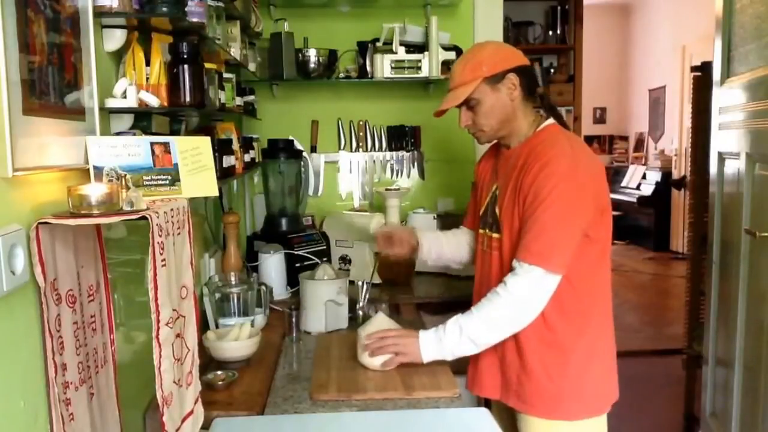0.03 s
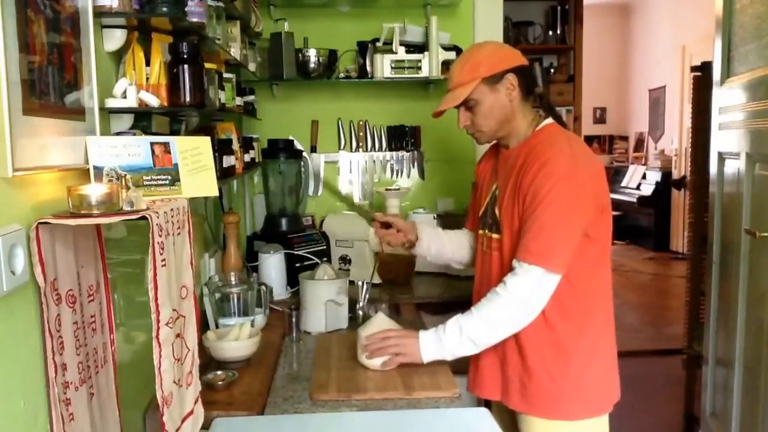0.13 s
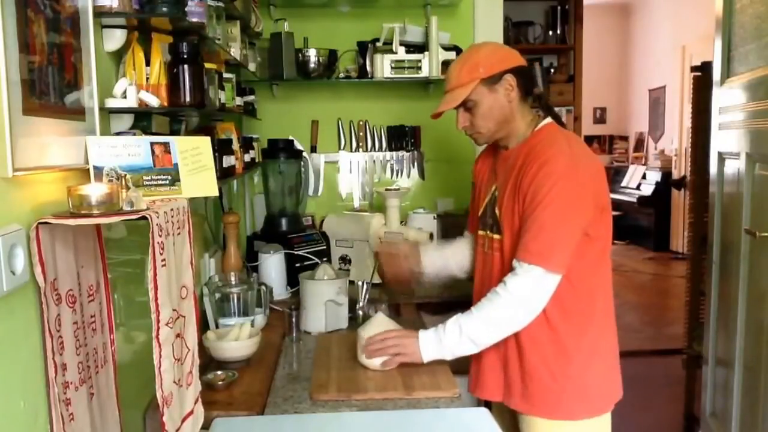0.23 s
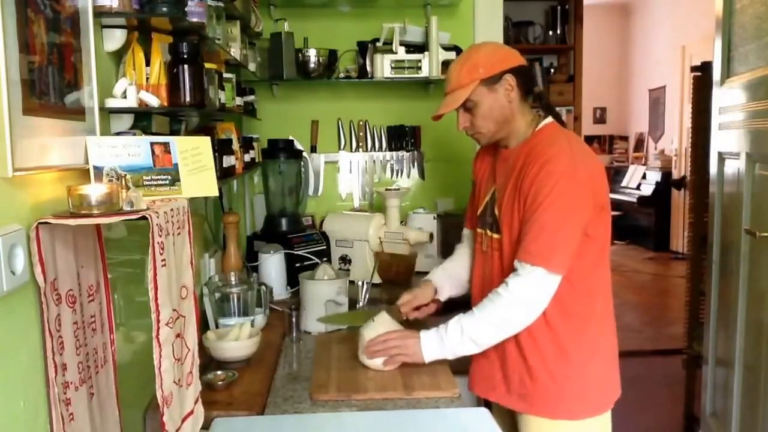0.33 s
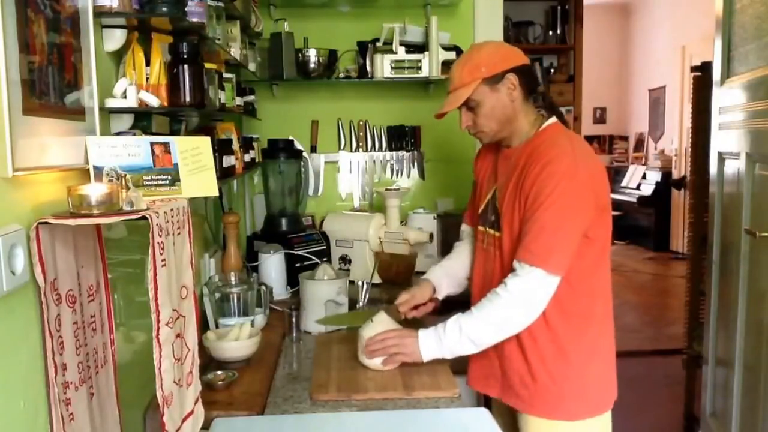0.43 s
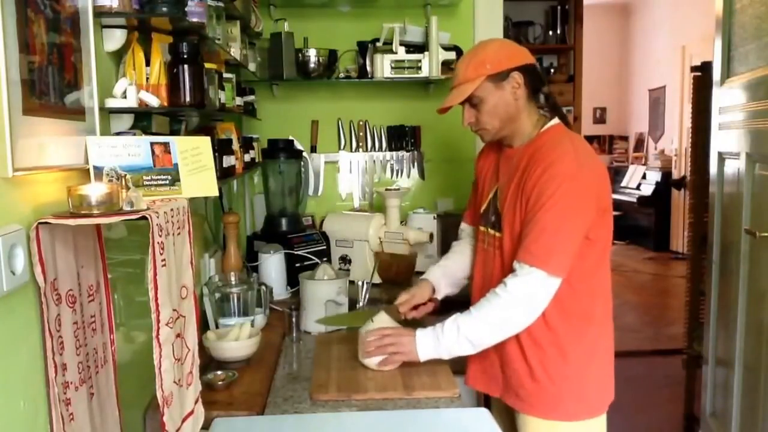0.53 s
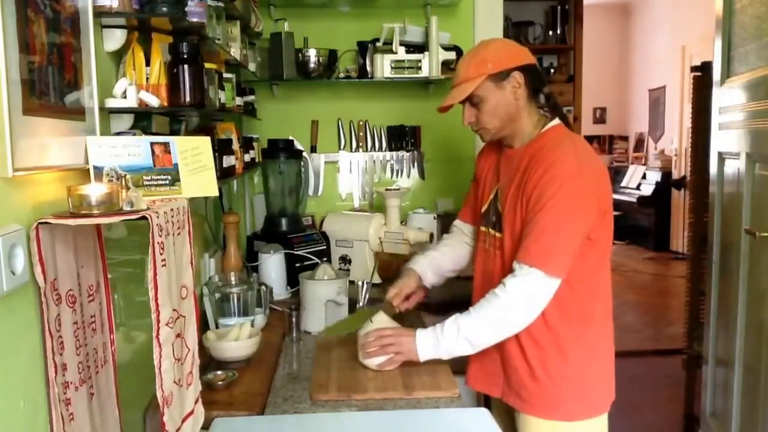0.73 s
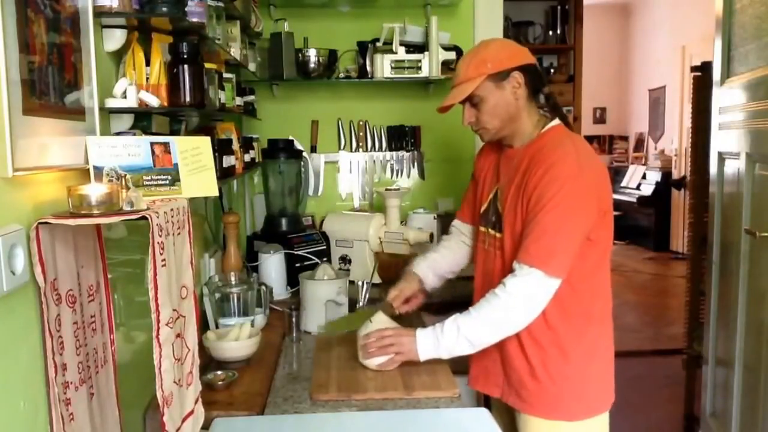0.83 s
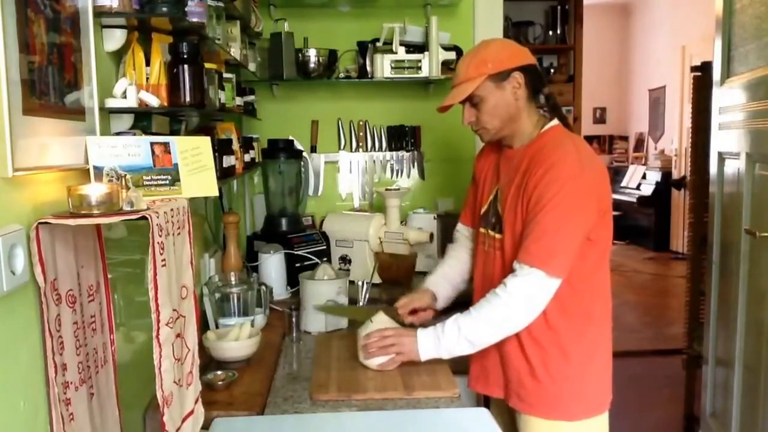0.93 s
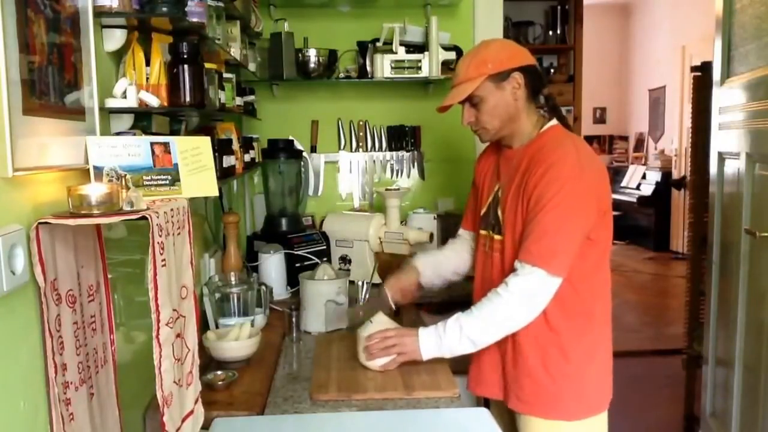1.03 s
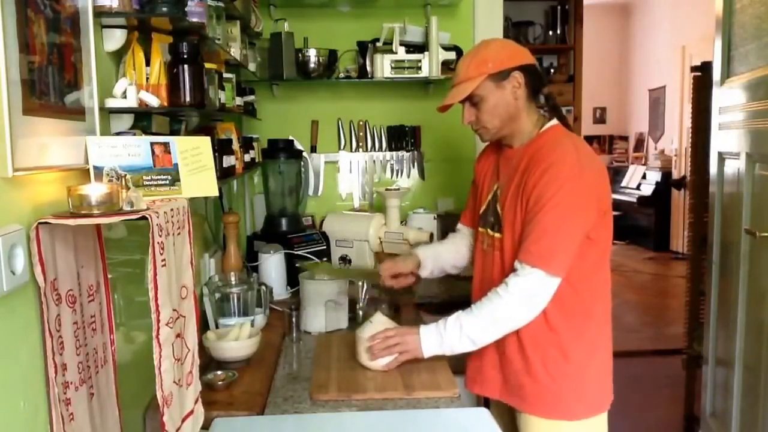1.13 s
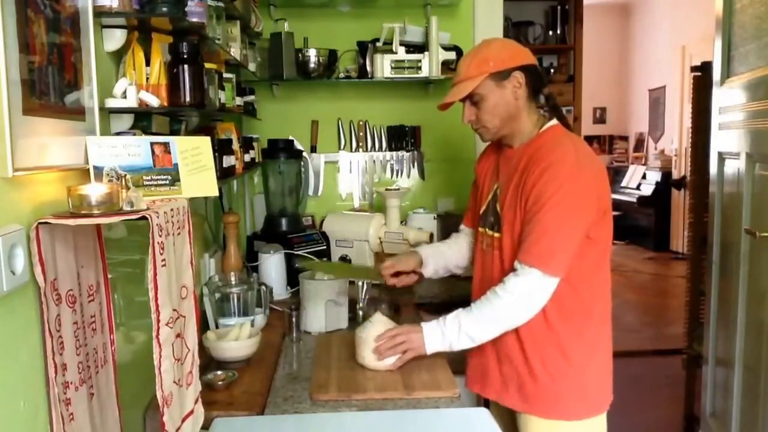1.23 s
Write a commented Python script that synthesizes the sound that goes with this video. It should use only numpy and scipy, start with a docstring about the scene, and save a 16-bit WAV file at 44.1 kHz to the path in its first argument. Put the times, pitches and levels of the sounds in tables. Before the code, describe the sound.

A heavy knife chops once into a husked coconut on a wooden board in a live kitchen

```python
"""In a live kitchen, a couple of metres away, a heavy knife chops once into a husked coconut on a wooden board.
Two noise bursts make the edge and cracking fibres; decaying sines make the knock, thump and blade ring.
A noise tail that loses its treble first, with a few echoes over its start, makes the room.
Then the blade is eased out with small squeaks (narrow-band noise) and scrapes (coloured noise bursts),
and the sleeve rustles as the arm lifts for the next blow, all over a faint steady hiss."""
import sys
import numpy as np
from scipy import signal
from scipy.fft import rfft, irfft
from scipy.io import wavfile

SR = 44100
rng = np.random.default_rng(int(sys.argv[2]) if len(sys.argv) > 2 else 0)


def unload_wav(signal):
    """Save mono or channel-first audio to the path in sys.argv[1] as 16-bit WAV at rate SR, clipped to [-1, 1]."""
    wavfile.write(
        sys.argv[1],
        SR,
        np.round(np.clip(np.atleast_2d(signal).T, -1, 1) * 32767).astype(np.int16),
    )


N = 57330
T = np.arange(N) / SR
CHOP_S = .2445  # the edge meets the husk


def from_db(db):
    """Decibels to gain."""
    return 10 ** (np.asarray(db) / 20)


def at_hz(points, hz, axis=1):
    """One column of a table, read along log frequency."""
    table = np.array(points)
    log_hz = np.log(np.maximum(hz, 1))
    return np.interp(log_hz, np.log(table[:, 0]), table[:, axis])


def noise(colour):
    """White noise shaped to a colour curve, rms 1."""
    hz = np.fft.rfftfreq(N, 1 / SR)
    spectrum = rfft(rng.standard_normal(N)) * from_db(at_hz(colour, hz))
    shaped = irfft(spectrum, N)
    return shaped / shaped.std()


def envelope(start, attack, hold, t60):
    """Exponential rise, then a fall of 60 dB per t60; the hold counts from the start."""
    age = np.maximum(T - start, 0)
    rise = 1 - np.exp(-age / attack)
    fall = np.exp(-np.log(1000) * np.maximum(age - hold, 0) / t60)
    return rise * fall


def ring(modes, start, attack, alternate=False):
    """Damped modes set going by one blow: decaying sines, every second one inverted if asked."""
    out = np.zeros(N)
    for k, (hz, db, t60) in enumerate(modes):
        sign = -1 if alternate and k % 2 else 1
        sine = np.sin(2 * np.pi * hz * (T - start))
        out += sign * from_db(db) * sine * envelope(start, attack, 0, t60)
    return out


# Stages of the blade's bite: t/s, level/dB, length/s
BITE_STAGES = [(0.2446, -14.5, 0.0012), (.2457, -10, 0.0013)]
# Colour of snapping fibres: f/Hz, relative level/dB per Hz
BITE_COLOUR = [(40, -35), (200, -12.5), (700, -6), (1500, -2.5), (4500, 2), (7500, -6.5), (11000, -1.5),
               (15000, -13)]


def bite():
    """Fibres snap in two very short noise bursts as the edge goes in."""
    out = np.zeros(N)
    for start, db, length in BITE_STAGES:
        out += from_db(db) * noise(BITE_COLOUR) * envelope(start, .0002, length, t60=0.0087)
    return out


# Damped modes of the nut: f/Hz, level/dB, t60/s
NUT_MODES = [(769, -18.5, 0.032), (1220, -5, 0.021), (1330, -10, 0.027), (1824, -8.5, .025)]


def knock():
    """The blade stops in the nut and sets its modes ringing; the contact time softens the onset."""
    return ring(NUT_MODES, start=.2492, attack=0.00068)


# Low modes of board, counter and room: f/Hz, level/dB, t60/s
BOOM_MODES = [(157.6, -23.5, .74), (153.9, -29.5, .92), (171.5, -20.5, .32), (267, -33, .5),
              (313, -34, .85), (326, -30, .55), (388, -26.5, .45), (468, -34, .8), (483, -31, .6),
              (528, -26.5, .48), (592, -37, .5)]


def thump():
    """Board, counter and room boom in low modes that swing in alternate directions."""
    return ring(BOOM_MODES, start=.250, attack=.008, alternate=True)


# Ring of the blade and the utensils near it: f/Hz, level/dB, t60/s
BLADE_MODES = [(1010.5, -26, .45), (1204, -30.5, .5), (1423, -42, 1), (2724, -27.5, 0.58),
               (4727, -32, 0.47)]


def blade_ring():
    """Modes of the blade and nearby utensils swell in gently and die away faintly."""
    return ring(BLADE_MODES, CHOP_S, attack=0.009)


# Distinct echoes from nearby walls: delay t/s, level/dB
WALL_ECHOES = [(.0085, -13), (0.0146, -14), (0.0349, -19)]
# The kitchen's answer to the blow: f/Hz, relative level/dB per Hz, t60/s
ROOM_TAIL = [(40, -51, 1.0), (74.2, -24.5, 1.0), (140, -2, 0.7), (260, -4.5, 0.74), (455, -1, 0.63),
             (640, -6, 0.62), (1460, 0, 0.63), (1600, -3.5, 0.63), (2430, -5.5, 0.58), (5200, -7, 0.53),
             (7800, -12.5, 0.47), (11600, -13, .33), (15500, -18, .27)]
ROOM_DB, ROOM_BUILD_S, ROOM_HOLD_S = -17, 0.0022, 0.029


def kitchen(direct):
    """A dense noise tail in overlapping bands, treble dying first, with a few wall echoes over its start."""
    echoes = np.zeros(N)
    for delay, db in WALL_ECHOES:
        echoes += from_db(db) * np.interp(T - delay, T, direct)

    hz = np.fft.rfftfreq(N, 1 / SR)
    field = rfft(noise([row[:2] for row in ROOM_TAIL]))
    centres = np.geomspace(40, 16000, 20)
    tail = np.zeros(N)
    # neighbouring bands cross-fade, so together they add up to the whole field
    for centre, weights in zip(centres, np.eye(len(centres))):
        band = irfft(field * np.interp(hz, centres, weights), N)
        t60 = at_hz(ROOM_TAIL, centre, axis=2)
        tail += band * envelope(CHOP_S + ROOM_BUILD_S, ROOM_BUILD_S, ROOM_HOLD_S, t60)
    return echoes + from_db(ROOM_DB) * tail


def chop():
    """Crack and knock with the room's answer, the thump below them and the blade's ring."""
    direct = bite() + knock()
    return direct + kitchen(direct) + thump() + blade_ring()


# Squeaks of the blade in the husk: t/s, f/Hz, level/dB, length/s
BLADE_SQUEAKS = [(0.85, 1537, -56.5, 0.0086), (0.898, 1019, -59.5, 0.015), (0.904, 1482, -65, 0.023)]
SQUEAK_WIDTH_HZ, SQUEAK_T60_S = 67, 0.27  # width of each of the two filter passes


def squeaks():
    """The blade squeaks against the husk: noise through a narrow resonance, twice."""
    out = np.zeros(N)
    for start, hz, db, length in BLADE_SQUEAKS:
        b, a = signal.iirpeak(hz, hz / SQUEAK_WIDTH_HZ, fs=SR)
        once = signal.lfilter(b, a, rng.standard_normal(N))
        tone = signal.lfilter(b, a, once)
        out += from_db(db) * tone / tone.std() * envelope(start, 0.0064, length, SQUEAK_T60_S)
    return out


# Short scrapes of steel on fibre: t/s, level/dB, t60/s
STEEL_SCRAPES = [(0.683, -55, 0.24), (.828, -65, 0.87), (1.012, -57.5, 0.39)]
# Colour of the scrapes: f/Hz, relative level/dB per Hz
SCRAPE_COLOUR = [(200, -49), (1000, 4.5), (3500, 0.5), (9000, -2.5), (15000, -7)]
SCRAPE_ATTACK_S = 0.0058


def scrapes():
    """Steel drags on fibre: coloured noise bursts with a quick onset and a longer fall."""
    out = np.zeros(N)
    for start, db, t60 in STEEL_SCRAPES:
        shape = envelope(start, SCRAPE_ATTACK_S, SCRAPE_ATTACK_S, t60)
        out += from_db(db) * noise(SCRAPE_COLOUR) * shape
    return out


# Rustle of the sleeve as the arm moves, then lifts: t/s, level/dB
SLEEVE_LEVEL = [(.3, -113), (.65, -63), (.99, -66.5), (1.06, -60.5), (1.12, -61), (1.17, -57), (1.215, -57),
                (1.24, -58.5), (1.3, -53.5)]
# Colour of the cloth: f/Hz, relative level/dB per Hz
SLEEVE_COLOUR = [(80, -36), (300, -5.5), (500, -5), (850, 3.5), (1300, -0.5), (3800, -3), (8000, -10.5),
                 (15000, -14.5)]


def sleeve():
    """Cloth rubs as the arm moves: coloured noise riding a drawn level curve."""
    level_db = np.interp(T, *np.transpose(SLEEVE_LEVEL))
    return from_db(level_db) * noise(SLEEVE_COLOUR)


# Colour of the steady background: f/Hz, relative level/dB per Hz
FLOOR_COLOUR = [(30, -24), (70, -15.5), (160, 12), (300, 7.5), (600, 0.5), (1500, -2.5), (4000, -5),
                (10000, -5.5), (15000, -8)]


def background():
    """A faint steady hiss: coloured noise at a fixed level."""
    return from_db(-64) * noise(FLOOR_COLOUR)


def scene():
    """One chop, the blade's withdrawal and the lifting arm over the background."""
    withdrawal = squeaks() + scrapes() + sleeve()
    return (chop() + withdrawal + background())[None]


def record(dry):
    """A steep low-pass cuts the top above 15.4 kHz."""
    low_pass = signal.ellip(12, .1, 70, 15400, fs=SR, output="sos")
    return signal.sosfilt(low_pass, dry)


dry = scene()
out = record(dry)
unload_wav(out)
```